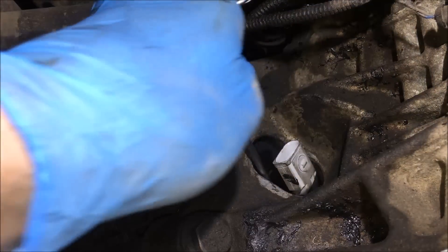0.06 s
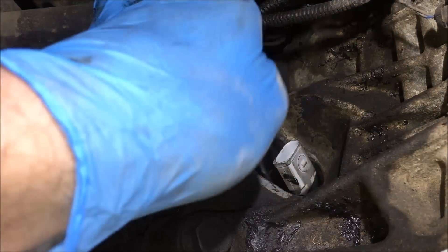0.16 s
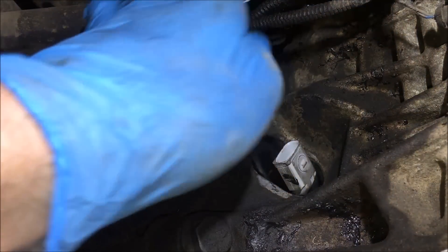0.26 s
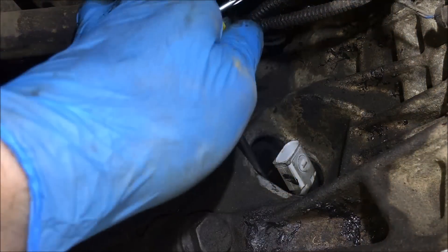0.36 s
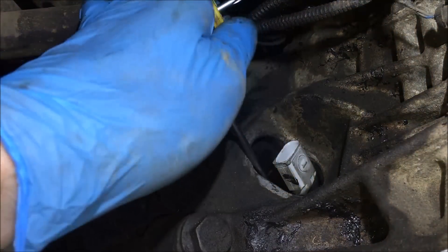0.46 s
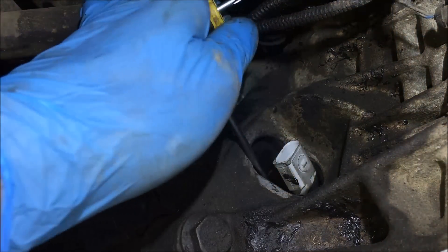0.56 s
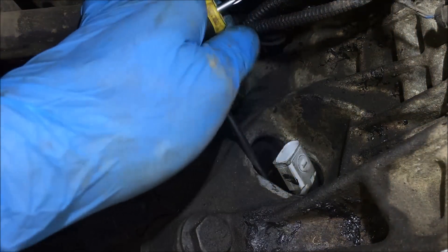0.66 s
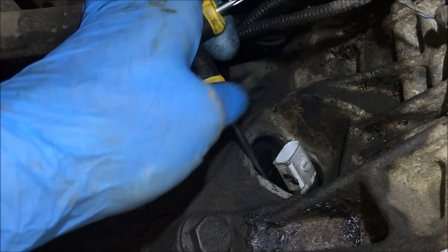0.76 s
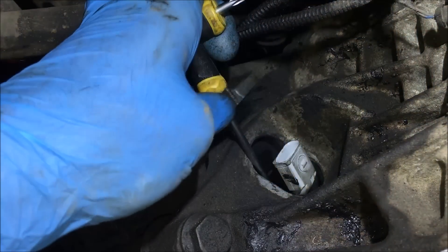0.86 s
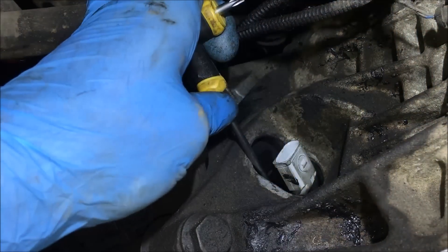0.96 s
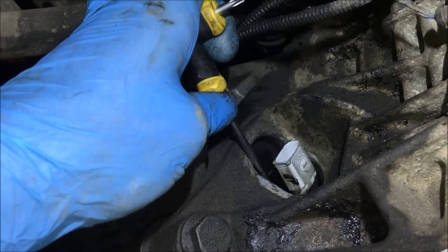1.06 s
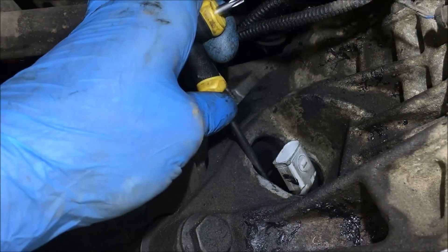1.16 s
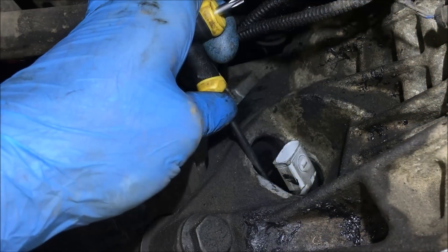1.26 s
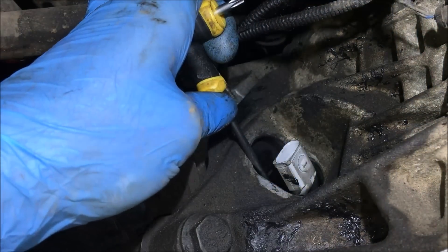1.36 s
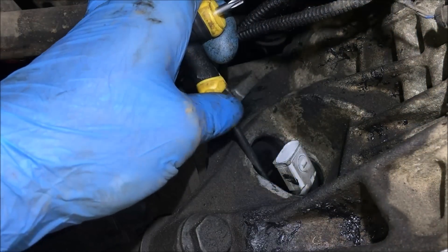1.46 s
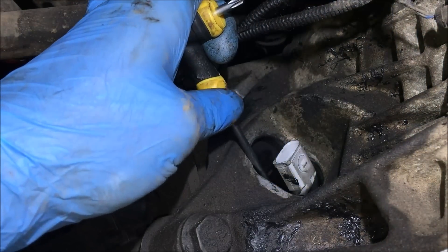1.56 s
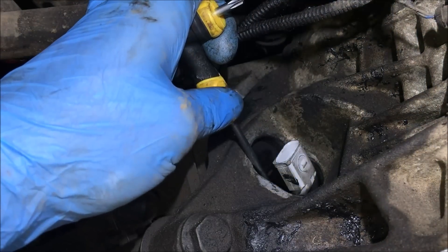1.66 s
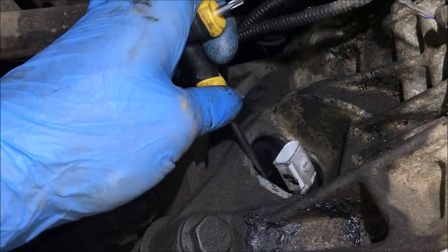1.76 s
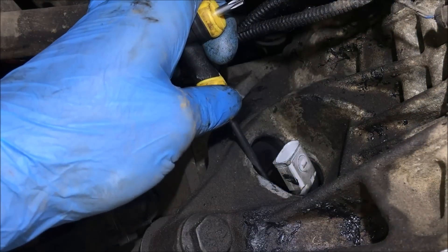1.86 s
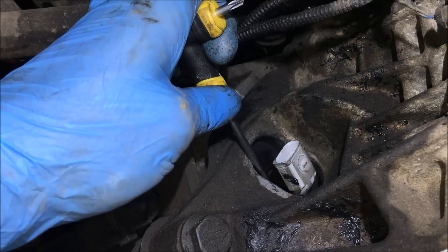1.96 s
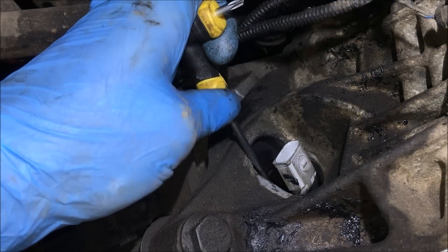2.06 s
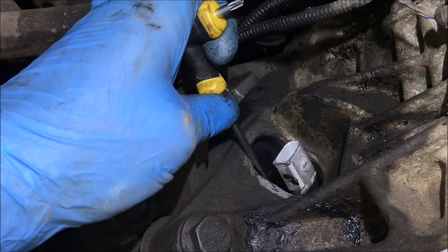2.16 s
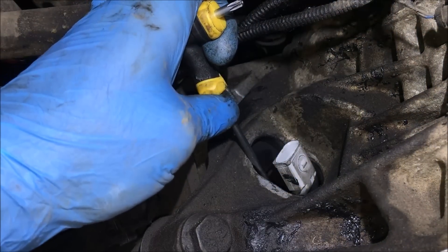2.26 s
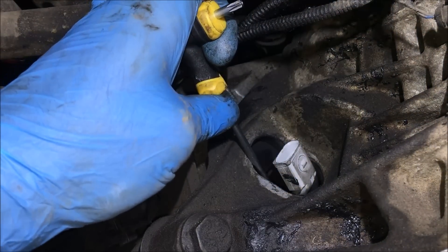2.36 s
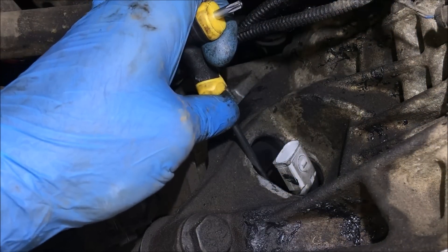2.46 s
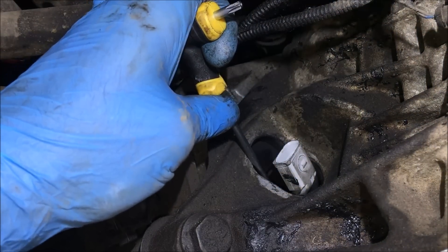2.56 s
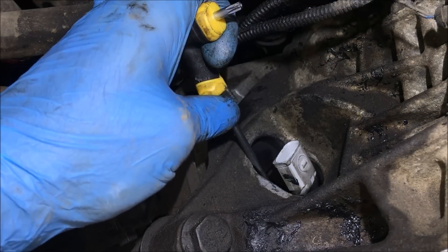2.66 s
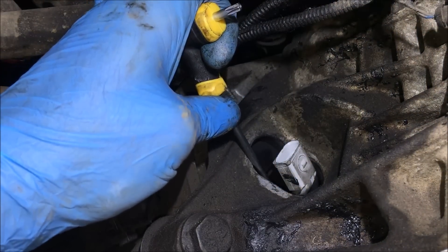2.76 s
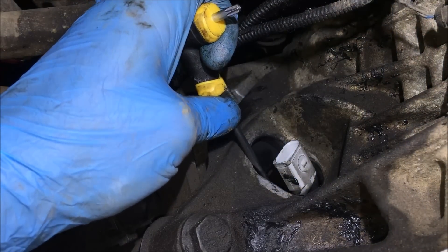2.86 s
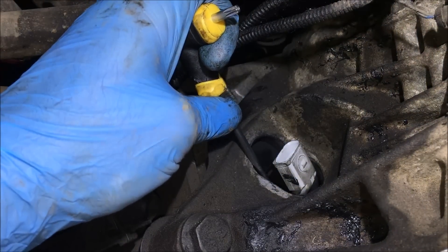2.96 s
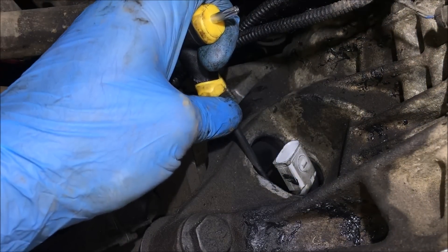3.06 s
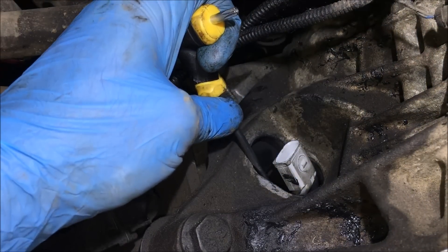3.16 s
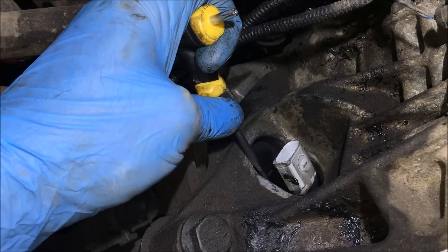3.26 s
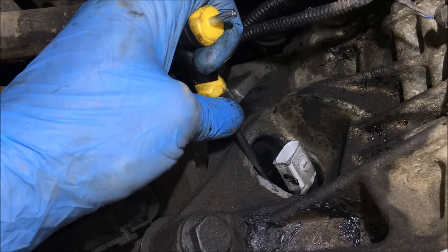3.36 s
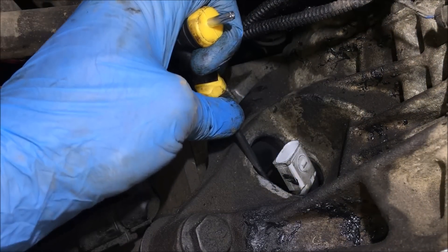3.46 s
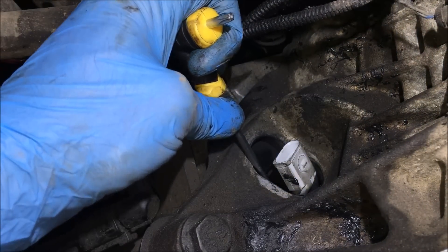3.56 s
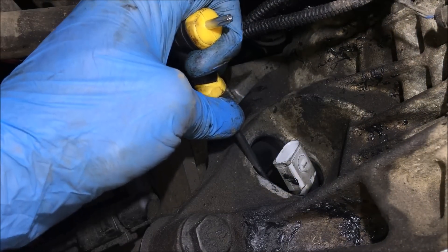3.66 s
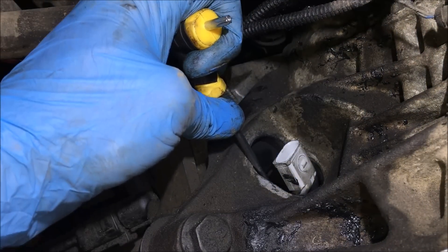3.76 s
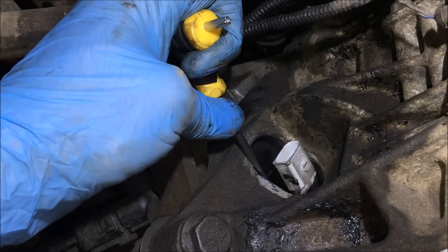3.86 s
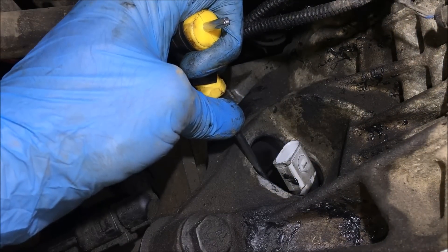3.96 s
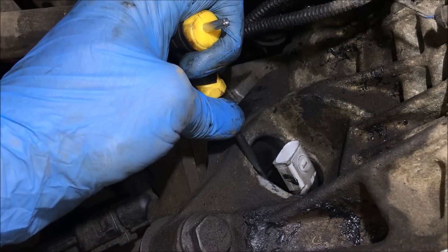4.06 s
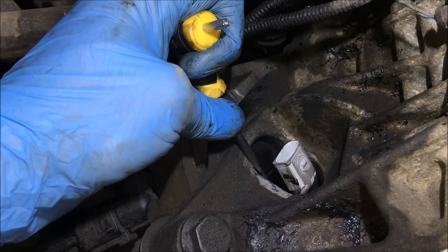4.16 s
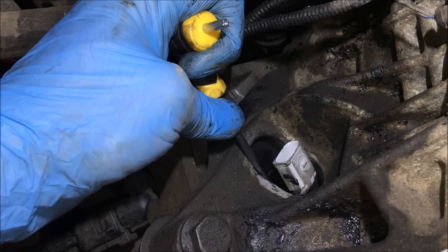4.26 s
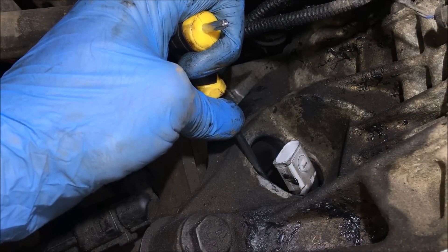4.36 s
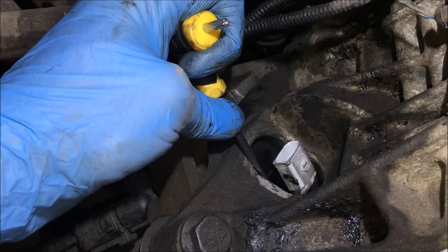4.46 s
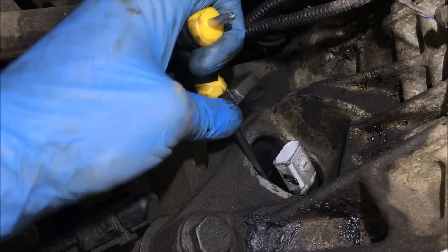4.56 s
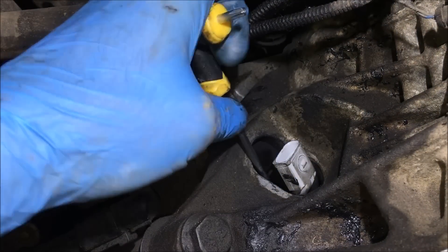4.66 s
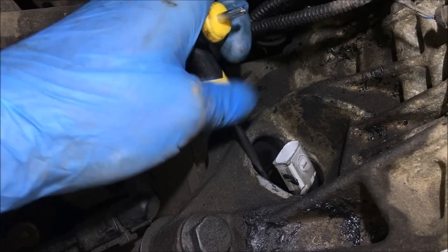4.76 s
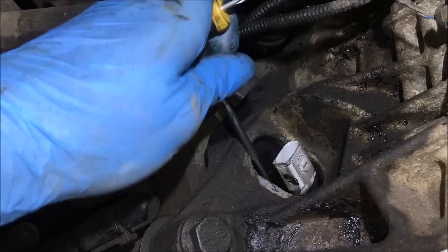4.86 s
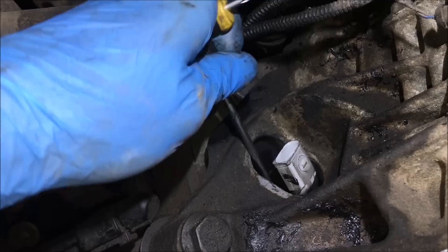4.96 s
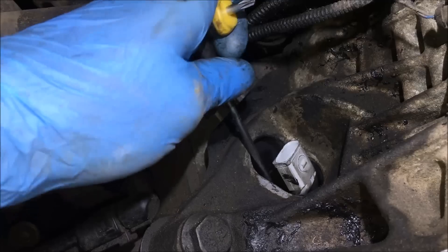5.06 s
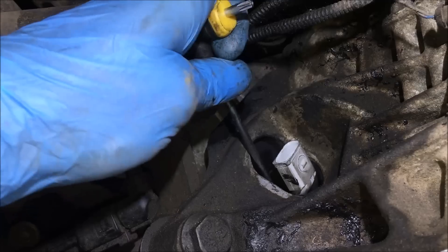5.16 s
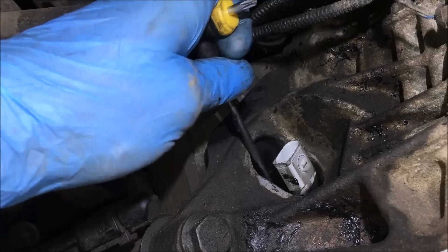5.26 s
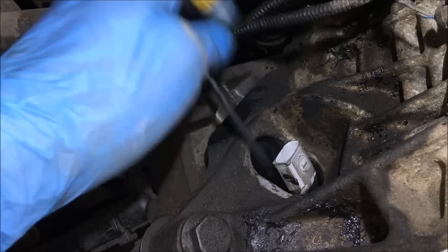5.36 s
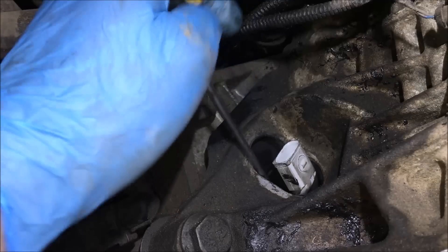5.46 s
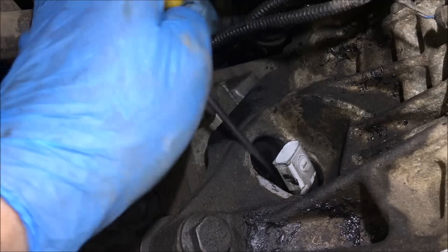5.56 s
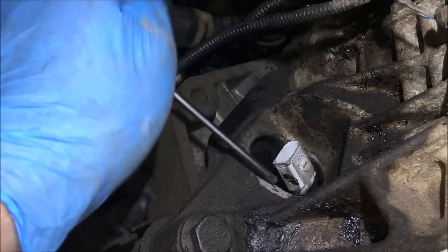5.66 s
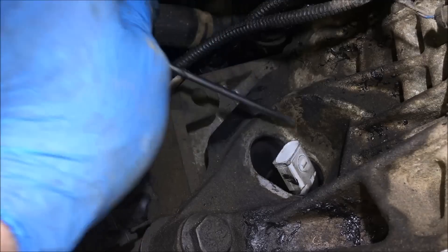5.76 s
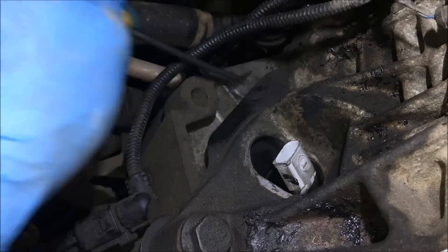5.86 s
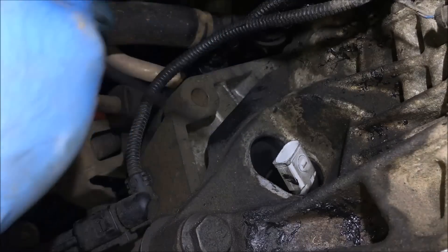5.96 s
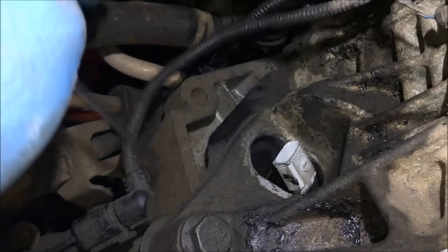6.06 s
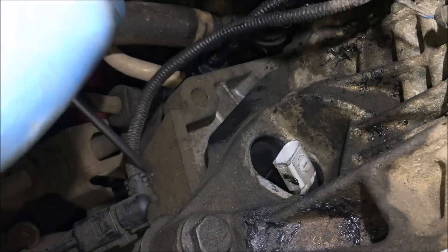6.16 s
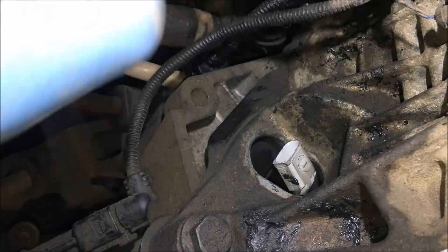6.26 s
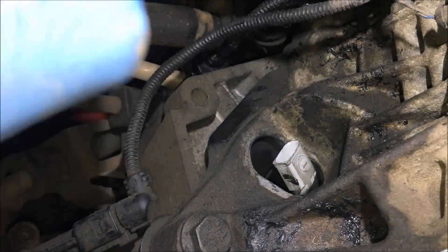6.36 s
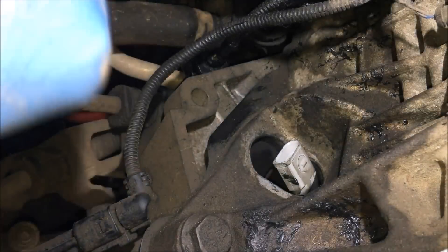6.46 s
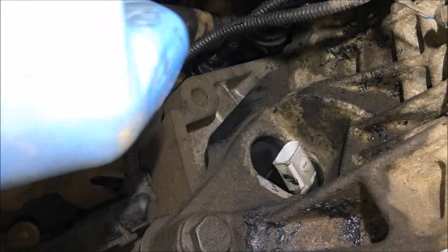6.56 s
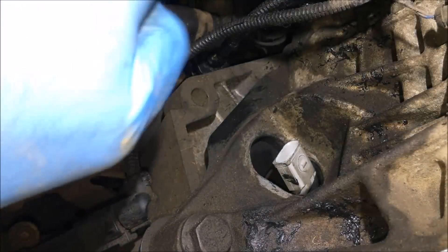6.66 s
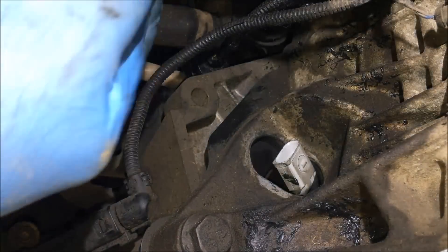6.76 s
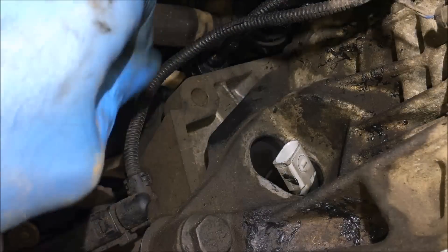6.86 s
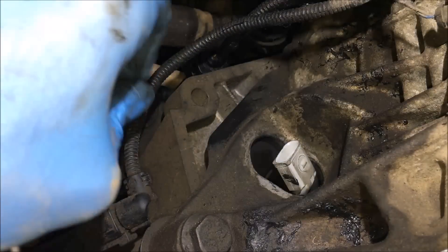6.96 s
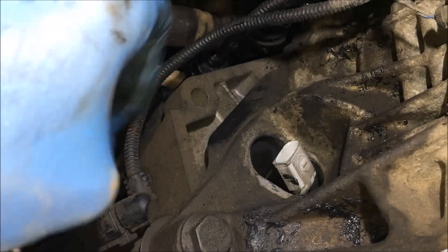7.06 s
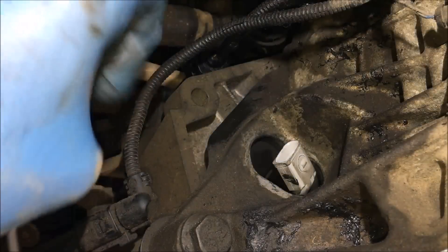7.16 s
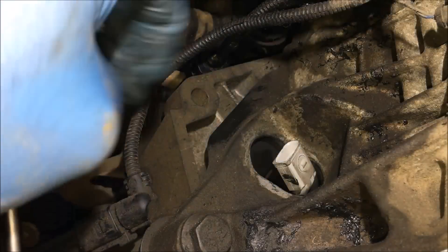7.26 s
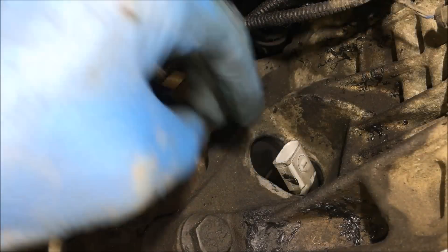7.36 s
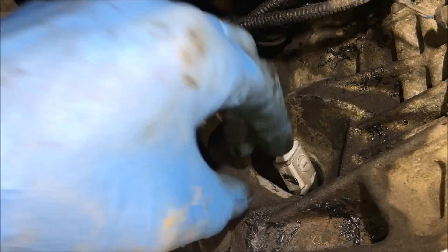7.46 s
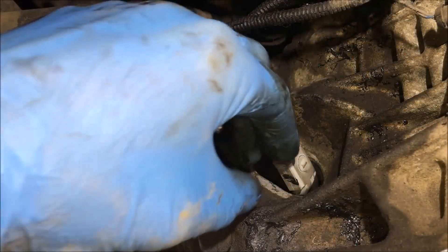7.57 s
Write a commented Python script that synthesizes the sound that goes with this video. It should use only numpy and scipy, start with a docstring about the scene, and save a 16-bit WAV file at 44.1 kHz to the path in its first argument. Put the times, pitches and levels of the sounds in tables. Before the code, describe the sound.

A low machine hum and receding traffic rumble lie under a close, quiet engine bay. One small metal clink comes early, then a rubber glove crackles and ticks faintly on a tool handle. Near the end the steel blade slips with a sharp click, then clatters, bumps and scrapes across the casting before the glove swishes away. Close microphone, short dense metal reflections.

```python
"""Close on an engine bay: a machine hums and traffic slowly recedes, with vehicle passes at 0.1 s and 1.9 s.
A gloved hand rustles and crackles as it levers a screwdriver against a sensor; one early clink at 0.4 s.
Thin chirps come from 1.6 s, a far engine drones from about 2 s, and the glove ticks on the handle from 2.9 s.
From 4.8 s the blade snaps off its seat, clinks, bumps and scrapes over the casting and is pulled away.
Hum and engine are sines, tyres and rubber are coloured noise and slips, metal is short bursts through modes."""
import sys
import numpy as np
from scipy import signal
from scipy.fft import rfft, irfft, next_fast_len
from scipy.io import wavfile
from scipy.ndimage import map_coordinates

SR = 44100
rng = np.random.default_rng(int(sys.argv[2]) if len(sys.argv) > 2 else 0)


def waveform_to_disk(signal):
    """Save audio, clipped to [-1, 1], as 16-bit WAV at the path in sys.argv[1]."""
    frames = np.transpose(np.atleast_2d(signal))
    scaled = np.clip(frames, -1, 1) * 32767
    samples = np.round(scaled).astype(np.int16)
    wavfile.write(sys.argv[1], SR, samples)


N = 335600  # length [samples]
TIME = np.arange(N) / SR


def amp(db):
    """Amplitude of a level in dB."""
    return 10 ** (np.asarray(db) / 20)


def unit(x):
    """x at rms 1."""
    return x / np.sqrt(np.mean(x ** 2) + 1e-20)


def along(points, hz):
    """Read a (frequency [Hz], level [dB]) table on a log frequency axis."""
    point_hz, value = np.transpose(points)
    return np.interp(np.log(hz + 1), np.log(point_hz), value)


def curves(rows):
    """One value per sample for each column after the time."""
    s, *columns = np.transpose(rows)
    return [np.interp(TIME, s, column) for column in columns]


def during(rows, fade):
    """1 while a table runs, fading to 0 outside it over fade seconds."""
    start, end = rows[0][0], rows[-1][0]
    return np.interp(TIME, [start - fade, start, end, end + fade], [0, 1, 1, 0])


def wobble(rate):
    """A smooth random curve with rate knots a second."""
    knots = rng.standard_normal(int(N * rate / SR) + 4)
    return map_coordinates(knots, [TIME * rate])


def swell(s, length):
    """A bell-shaped rise and fall around time s."""
    return np.exp(-((TIME - s) / length) ** 2 / 2)


def coloured(x, gain):
    """x through a causal minimum-phase filter with the given gain over frequency."""
    m = 2 * next_fast_len(len(x) // 2 + 2048)
    log_gain = np.log(np.maximum(gain(np.fft.rfftfreq(m, 1 / SR)), 1e-6))
    cepstrum = irfft(log_gain)
    # folding the cepstrum forward in time makes the filter causal
    cepstrum[1:m // 2] *= 2
    cepstrum[m // 2 + 1:] = 0
    return irfft(rfft(x, m) * np.exp(rfft(cepstrum)))[:len(x)]


def shaped(x, spectrum):
    """x with a (frequency [Hz], level [dB]) colour, at rms 1."""
    return unit(coloured(x, lambda hz: amp(along(spectrum, hz))))


def slips(rate, spread_db):
    """Tiny impulses at random moments, about rate a second and of uneven size, at rms 1."""
    moments = rng.random(N) < rate / SR
    signs = rng.choice([-1, 1], N)
    sizes = amp(spread_db * np.clip(rng.standard_normal(N), -2, 2))
    return unit(moments * signs * sizes)


def add(track, s, sound):
    """Mix a sound in at time s."""
    part = track[round(s * SR):][:len(sound)]
    part += sound[:len(part)]


def bay(scatter_db=2, t60=0.034, room_db=-14, room_t60=0.14):
    """Direct sound, dense echoes from the engine parts and a weak workshop tail; new on every call."""
    t = np.arange(SR // 4) / SR
    near = rng.standard_normal(len(t)) * amp(-60 * t / t60)
    far = rng.standard_normal(len(t)) * amp(-60 * t / room_t60)
    near_echoes = amp(scatter_db) * near / np.linalg.norm(near)
    response = near_echoes + amp(room_db) * far / np.linalg.norm(far)
    response[0] += 1  # direct sound
    return response


def in_bay(x, drift_rate=8):
    """x with echoes that drift between two spots as the hand moves."""
    here, there = (signal.fftconvolve(x, bay())[:N] for _ in range(2))
    turn = 2 * wobble(drift_rate)
    return np.cos(turn) * here + np.sin(turn) * there


# the machine's hum, before trim and wavering: (time [s], fundamental level [dB], octave level [dB])
HUM_LEVELS = [(0.0, -33, -55), (0.12, -33.5, -38.5), (1.5, -43, -48.5), (2.11, -38, -48.5),
              (3.89, -39, -51.5), (4.01, -37, -59), (4.97, -39, -46), (5.05, -42.5, -56), (7.5, -49.5, -61)]
HUM_HZ = 55.86  # centre of the slightly wandering fundamental


def hum(base_db=-1, octave_db=-3):
    """A machine turns at a nearly steady speed; fundamental and octave waver in level."""
    low_db, high_db = curves(HUM_LEVELS)
    phase = 2 * np.pi * np.cumsum(HUM_HZ + .5 * wobble(5.3)) / SR
    base = amp(low_db + base_db + 1.6 * wobble(7)) * np.sin(phase)
    octave = amp(high_db + octave_db + 2.5 * wobble(10)) * np.sin(2 * phase + 1.2 * wobble(12))
    return np.sqrt(2) * (base + octave)


# colour of the low traffic rumble: (frequency [Hz], level [dB])
RUMBLE_COLOUR = [(20, -9.5), (36, -6.5), (50, 18.5), (65, 1), (88, 17), (115, 5.5), (150, -3.5), (200, -1),
                 (300, 0.5), (420, -10.5), (700, -15.5), (2000, -56)]
# colour of the tyre roar: (frequency [Hz], level [dB])
TYRE_COLOUR = [(200, 2), (450, -10.5), (610, 1.5), (800, -2), (970, 4), (1075, 8.5), (1200, 2), (1420, 2.5),
               (1850, -0.5), (2500, -7), (3500, -16), (6000, -21.5), (10000, -40), (16000, -39)]
# vehicles pass far off: (time [s], tyre roar level before flutter [dB], half length [s])
VEHICLE_PASSES = [(0.12, -60, 0.25), (1.937, -55, 0.35)]
# a distant engine: (time [s], firing rate [Hz], level before trim [dB])
ENGINE_DRONE = [(2.35, 66.1, -44), (2.61, 80.5, -37.5), (3, 84, -39.5), (3.9, 75.5, -38),
                (4.35, 58.24, -38), (4.68, 65.5, -36.5), (5.18, 72.75, -37), (5.93, 82.8, -35),
                (6.15, 81, -48)]
ROAR_DB, RUMBLE_DB = -53.5, -42.5  # steady traffic at the start: tyres (before flutter), low rumble
ROAR_FALL_DB_PER_S, RUMBLE_FALL_DB_PER_S = 0.92, 0.78  # the traffic slowly recedes


def traffic(engine_db=-1):
    """A far engine rises and falls in speed; tyres roar over a low rumble and swell as vehicles pass."""
    rumble_level = amp(RUMBLE_DB - RUMBLE_FALL_DB_PER_S * TIME)
    rumble = rumble_level * shaped(rng.standard_normal(N), RUMBLE_COLOUR)
    steady_roar = amp(ROAR_DB - ROAR_FALL_DB_PER_S * TIME)
    passing_roar = sum(amp(db) * swell(s, length) for s, db, length in VEHICLE_PASSES)
    flutter = amp(1.5 * wobble(4.48))
    tyres = (steady_roar + passing_roar) * flutter * shaped(rng.standard_normal(N), TYRE_COLOUR)
    firing_hz, drone_db = curves(ENGINE_DRONE)
    firing = np.sin(2 * np.pi * np.cumsum(firing_hz) / SR)
    engine = np.sqrt(2) * amp(drone_db + engine_db) * during(ENGINE_DRONE, fade=0.27) * firing
    return rumble + tyres + engine


# the hand shifts its hold or pulls away: (start [s], length [s], rustle level before trim [dB])
HAND_MOVES = [(0, 0.99, -72), (2.2, 2.14, -74), (2.986, 0.64, -66), (4.754, 0.43, -60), (5.456, 2.07, -61),
              (5.978, .33, -50.5)]
MOVE_RISE_S, MOVE_FALL_S = 0.083, 0.095  # time constants: a move builds and dies away
HOLDING_DB = -80  # rustle of the hand holding still, before trim


def hand_motion():
    """Rustle level in dB: every move rises, holds and dies away over the resting hand."""
    power = amp(HOLDING_DB) ** 2
    for start, length, db in HAND_MOVES:
        before = np.maximum(start - TIME, 0) / MOVE_RISE_S
        after = np.maximum(TIME - start - length, 0) / MOVE_FALL_S
        power = power + (amp(db) * np.exp(-before - after)) ** 2
    return 10 * np.log10(power)


# the glove brushes past things: (time [s], level before flutter [dB], half length [s])
GLOVE_SWISHES = [(.109, -56, 0.016), (0.222, -58.5, 0.019), (0.839, -54, 0.024), (4.785, -47.5, 0.024),
                 (4.959, -33.5, .008), (5.489, -41, 0.016), (6.392, -39.5, 0.024), (6.644, -40, 0.012),
                 (6.807, -47.5, 0.019), (6.899, -54, 0.034), (7.001, -46, 0.025), (7.219, -38, 0.005),
                 (7.244, -46, .009), (7.41, -49, 0.017)]
# colour of sliding rubber: (frequency [Hz], level [dB])
RUBBER_COLOUR = [(200, -38), (600, 0.5), (2000, -1), (4000, 2), (6000, 2.5), (9000, 2.5), (10400, -2.5),
                 (12000, -0.5), (15500, -4)]
# colour of rubber slipping on the handle: (frequency [Hz], level [dB])
CREAK_COLOUR = [(300, -24), (1500, -5), (3500, 4.5), (6000, 0.5), (8000, -5.5), (10400, -3.5),
                (11800, -3.5), (13000, -7), (15500, -22.5)]
GRIP_DB, GRIP_FOLLOWS = -75.5, 0.49  # crackle of the strained rubber at rest; its dB per dB of rustle


def glove(rustle_db=1, swish_db=0):
    """Rubber slides with a fine grain, swishes among the engine parts, crackles more as the hand moves."""
    slide_db = hand_motion()
    slide_level = amp(slide_db + rustle_db + 3.2 * wobble(30))
    slide = slide_level * shaped(slips(rate=10000, spread_db=8.0), RUBBER_COLOUR)

    strokes = sum(amp(db) * swell(s, length) for s, db, length in GLOVE_SWISHES)
    swish_level = amp(swish_db + 3.3 * wobble(90)) * strokes
    swish = swish_level * shaped(in_bay(slips(rate=1800, spread_db=4)), RUBBER_COLOUR)

    grip_db = GRIP_DB + GRIP_FOLLOWS * (slide_db - HOLDING_DB)
    crackle = amp(grip_db) * shaped(in_bay(slips(rate=190, spread_db=-0.5)), CREAK_COLOUR)
    return slide + swish + crackle


# modes of blade and casting: (frequency [Hz], width [Hz], level [dB])
STEEL_MODES = [(480, 23, -5.5), (1305, 39, -1.5), (2024, 44, -5.5), (2330, 89, -4), (2655, 49, -4),
               (3340, 150, 1), (3525, 200, 1), (4360, 200, -7), (5170, 130, -30), (5624, 120, -1),
               (6200, 580, -6), (6750, 104, -1.5), (6860, 32, -12), (7000, 320, -6.5), (8880, 180, -1),
               (11400, 160, -11.5)]
# the dry crack of a contact, before trim: (frequency [Hz], level [dB])
CRACK_COLOUR = [(150, -3.5), (450, -5.5), (850, -13.5), (1300, -6.5), (3400, -9.5), (4600, -5), (6200, -4),
                (9500, -5), (15500, -23)]


def steel(hz, crack_db=-5):
    """Gain of blade and casting: hand-damped modes over a broad crack."""
    modes = sum(amp(db) ** 2 / (1 + (2 * (hz - centre) / width) ** 2) for centre, width, db in STEEL_MODES)
    crack = amp(crack_db + along(CRACK_COLOUR, hz)) ** 2
    return np.sqrt(modes + crack)


def favour(hz, best_hz, best_db, width=0.23):
    """Gain of the modes that one contact point excites best; width in log frequency."""
    return amp(best_db * np.exp(-(np.log((hz + 1) / best_hz) / width) ** 2))


def chatter(span=0.000484, size=256):
    """Metal on metal: a very short cluster of micro-bounces with a flat spectrum."""
    u = np.arange(size) / SR / span
    spectrum = rfft(rng.standard_normal(size) * np.sqrt(u) * np.exp(-u))
    return irfft(spectrum / np.abs(spectrum))


# the blade strikes: (time [s], level over 10 ms [dB], body tilt [dB], edge tilt [dB],
#                     favoured frequency [Hz], favoured boost [dB])
BLADE_TAPS = [(0.434, -30.5, -4, 0.5, 4220, 10.5), (4.7579, -45.5, 7, 25, 11560, 9),
              (4.957, -24.5, 7, -10, 2690, 12.5), (5.1465, -49, 7, 5, 5630, 9),
              (5.4726, -24.5, 11, -1, 5700, 10.5), (5.5344, -19, 6.5, -8, 3120, 11),
              (5.5511, -34.5, 17, -13, 3460, 13), (5.597, -27, 2, 19, 3140, 12),
              (5.6095, -21, -12, 19, 5370, 14.5), (5.6665, -34, -0.5, -13, 3244, 6),
              (5.6761, -33, 7, -8, 3300, 16), (5.739, -25.5, 2.5, 10.5, 5760, 13),
              (5.8367, -22, 6, 10, 9200, 7.5), (5.857, -18.5, 2, -5, 7070, 7),
              (5.8939, -21.5, -3.5, 4, 6500, 13.5), (5.967, -38.5, 9, 5, 5590, 10),
              (6.0293, -20, -1.5, 5.5, 4840, 10), (6.1202, -27.5, 4, 5, 4070, 7),
              (6.197, -30.5, 7, 6, 5940, 4), (6.227, -22.5, 0.5, 11.5, 2660, 15),
              (7.239, -37, -5, 21, 4000, 2)]


def taps(level_db=0):
    """Each contact chatters into the modes, with its own body, edge and favoured pitch."""
    out = np.zeros(N)
    for s, db, body_db, edge_db, best_hz, best_db in BLADE_TAPS:
        tilt = [(600, 0), (1400, body_db), (4000, 0), (6000, 0), (14000, edge_db)]  # (Hz, dB)
        contact = signal.fftconvolve(chatter(), bay())
        hit = coloured(contact, lambda hz: steel(hz) * amp(along(tilt, hz)) * favour(hz, best_hz, best_db))
        # the hit's whole energy counts as a level over 10 ms
        add(out, s, amp(db + level_db) * hit * np.sqrt(SR / 100) / np.linalg.norm(hit))
    return out


# faint thin chirps: (time [s], level of the modulated sine's envelope [dB], frequency [Hz],
#                     glide [Hz per s], half length [s])
THIN_CHIRPS = [(1.586, -65, 4570, 1200, .081), (2.005, -66, 7280, -800, 0.094),
               (2.143, -59, 4270, 1000, 0.11), (2.28, -66, 5650, -800, 0.067),
               (2.38, -66.5, 4900, 600, 0.16)]


def chirps(width_hz=240):
    """Narrow gliding whistles: a sweeping sine blurred by a random envelope, barely above the background."""
    out = np.zeros(N)
    for s, db, hz, glide, length in THIN_CHIRPS:
        t = TIME - s
        envelope = amp(db) * np.exp(-(t / length) ** 2)
        whistle = np.sin(2 * np.pi * (hz + glide * t / 2) * t)
        out += envelope * unit(wobble(2 * width_hz)) * whistle
    return out


# the strained glove ticks on the handle: (time [s], level over 1 ms before trim [dB])
GLOVE_TICKS = [(2.894, -53.5), (3.078, -47), (3.1186, -50), (3.1838, -52), (3.3855, -50), (3.543, -47.5),
               (3.8101, -51), (4.0037, -51.5), (4.0852, -52), (4.359, -53.5)]


def ticks(level_db=3):
    """Rubber lets go of the handle in single dry slips, each a short burst of echoes."""
    out = np.zeros(N)
    for s, db in GLOVE_TICKS:
        tick = shaped(bay(scatter_db=8, t60=0.031, room_db=0, room_t60=0.082), CREAK_COLOUR)
        # the tick's whole energy counts as a level over 1 ms
        add(out, s, amp(db + level_db) * tick * np.sqrt(SR / 1000) / np.linalg.norm(tick))
    return out


# dull bumps of hand and handle: (time [s], level before trim [dB], frequency [Hz], decay by 60 dB [s])
HANDLE_BUMPS = [(4.912, -42.5, 340.4, 0.12), (5.505, -27, 159, 0.085), (5.506, -28.5, 302, 0.056),
                (5.777, -31, 182, 0.084), (5.777, -22, 564, 0.013), (5.857, -35, 466, 0.15),
                (6.227, -29, 282, 0.027), (6.395, -30.5, 260, 0.043), (7.237, -32, 233, 0.042)]


def bumps(level_db=3, thud_db=-4):
    """Soft blows: one low damped mode and a muffled thud."""
    out, t = np.zeros(N), np.arange(SR // 4) / SR
    thud_colour = [(70, 3.5), (160, -7), (350, -12.5), (700, -22.5), (1500, -52), (4000, -88)]  # (Hz, dB)
    for s, db, hz, t60 in HANDLE_BUMPS:
        thud = shaped(rng.standard_normal(len(t)), thud_colour)
        fade = amp(-60 * t / t60) * (1 - np.exp(-t / .001))  # soft onset, then decay
        mode = np.sin(2 * np.pi * hz * t)
        add(out, s, amp(db + level_db) * fade * (mode + amp(thud_db) * thud))
    return out


# the blade drags over the casting: (time [s], level [dB], half length [s], favoured frequency [Hz])
SCRAPE_STROKES = [(4.973, -46, 0.0098, 3350), (5.457, -43, 0.0046, 5900), (5.545, -38, 0.0073, 3420),
                  (5.605, -29, .01, 3350), (5.684, -37.5, 0.012, 3380), (5.731, -35.5, 0.0078, 3380),
                  (5.779, -39.5, .011, 3470), (5.885, -38.5, 0.012, 6800), (5.947, -39.5, .016, 6000),
                  (6.062, -35, 0.018, 3300), (6.146, -39, 0.026, 4140), (6.208, -31.5, 0.015, 6240)]


def scrape(level_db=0, best_db=13):
    """The tip sticks and slips over rough metal and keeps the modes ringing."""
    out = np.zeros(N)
    friction = in_bay(slips(rate=600, spread_db=3.0))
    t = np.arange(-SR // 8, SR // 8) / SR
    for s, db, length, best_hz in SCRAPE_STROKES:
        rub = friction[round(s * SR):][:len(t)]
        grit = coloured(rub, lambda hz: steel(hz) * favour(hz, best_hz, best_db, width=0.12))
        stroke = np.exp(-(t / length) ** 2 / 2)
        add(out, s + t[0], amp(db + level_db) * stroke * unit(grit))
    return out


def scene():
    """The tool and the glove in front of the workshop background."""
    background = hum() + traffic() + chirps()
    rubber = glove() + ticks()
    tool = taps() + bumps() + scrape()
    return (background + rubber + tool)[None]


TOP_HZ = 15900  # band limit of the recorder


def record(dry):
    """The recorder keeps nothing above its band limit."""
    m = next_fast_len(N + SR // 2)
    passband = np.fft.rfftfreq(m, 1 / SR) < TOP_HZ
    return irfft(rfft(dry, m) * passband, m)[..., :N]


dry = scene()
out = record(dry)
waveform_to_disk(out)
```